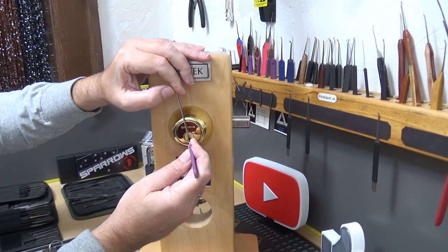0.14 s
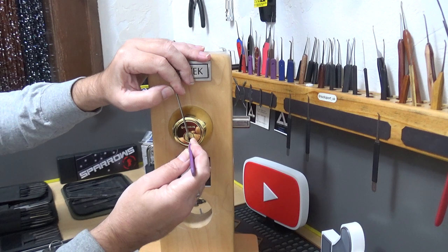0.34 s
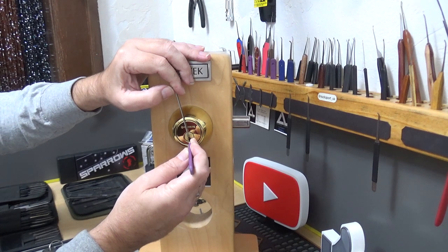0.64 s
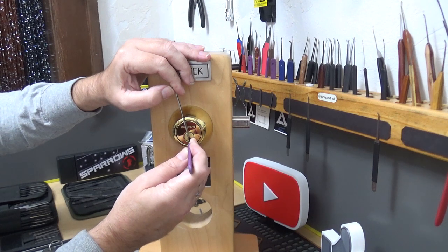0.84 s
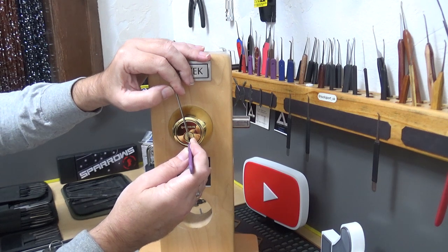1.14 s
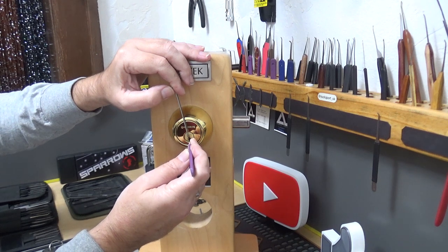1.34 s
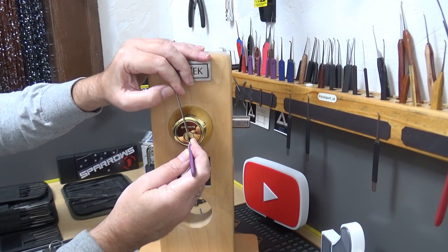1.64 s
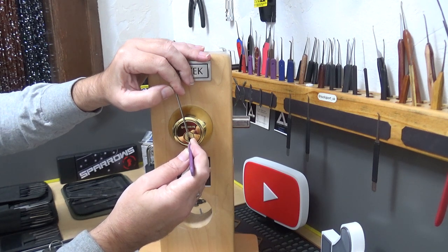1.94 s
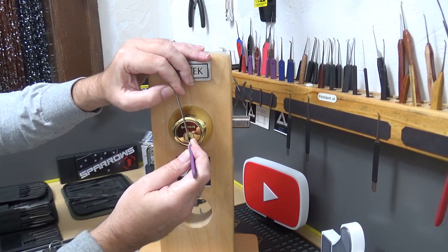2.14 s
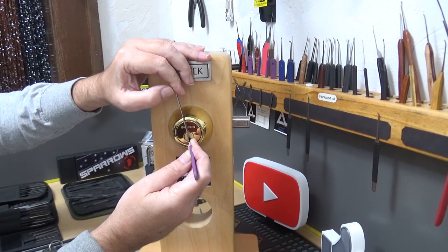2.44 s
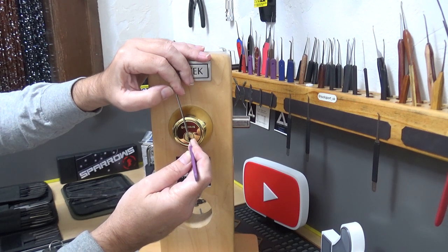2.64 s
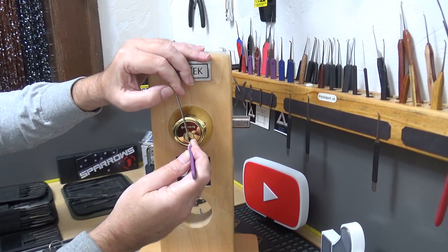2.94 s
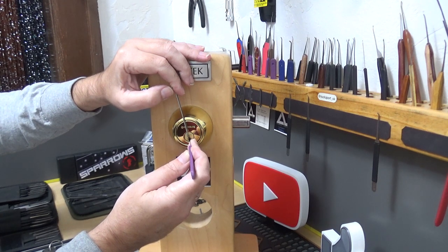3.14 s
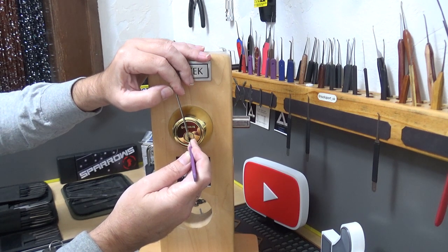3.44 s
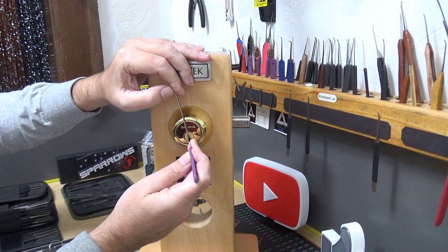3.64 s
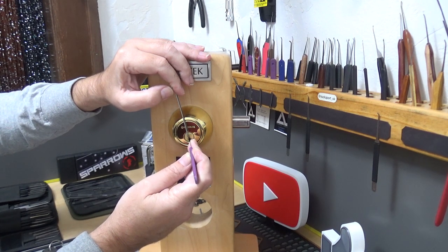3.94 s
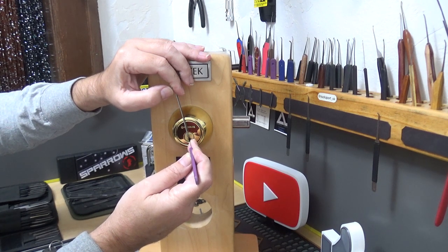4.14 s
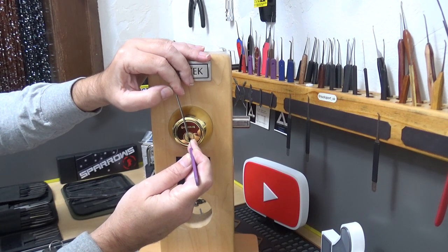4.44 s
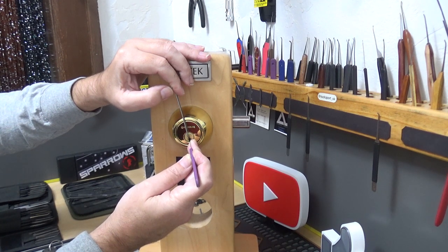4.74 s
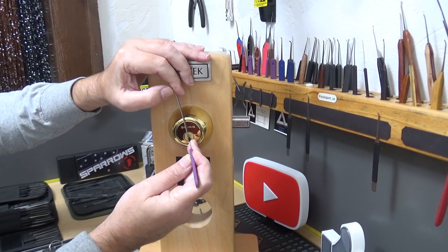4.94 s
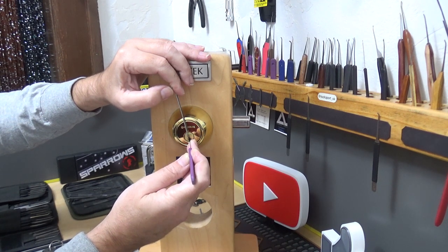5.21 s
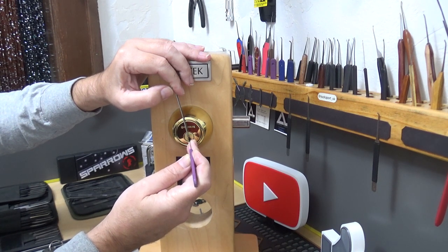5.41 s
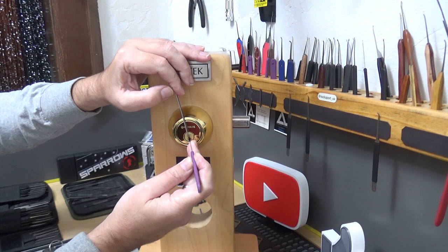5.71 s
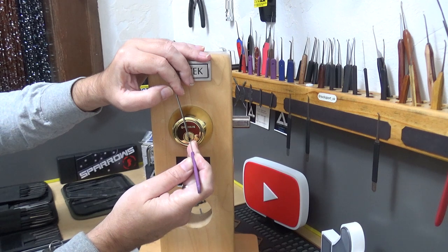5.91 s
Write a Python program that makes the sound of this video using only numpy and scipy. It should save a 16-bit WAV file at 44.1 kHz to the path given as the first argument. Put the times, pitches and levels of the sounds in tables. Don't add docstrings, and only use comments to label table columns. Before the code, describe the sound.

A small quiet room with steady soft hiss and a low murmur, heard close to a brass lock in a wooden stand on a bench. Around 0.55-0.65 s a faint tap and a clear click break the quiet. At 1.3 s a quick double knock lands, with another pair near 1.5 s, woody and metallic, with slight bench thumps. Faint ticks follow; a knock at 2.4 and a bright, ringing snap at 2.6, then a smaller pin click at 3.0. Near 3.46 s the pick scrapes grainily, straight into a hard snap at 3.54 with a dull thump. Only faint creaks and taps remain until the loudest crack at 4.85, with a heavier low thump. The hiss then drops; light clicks and short drags cluster around 5.1, tiny ticks at 5.8, and a last small click at 6.03. Every sound is short, with a brief room tail.

```python
import sys
import numpy as np
from scipy import signal
from scipy.fft import rfft, irfft, next_fast_len
from scipy.io import wavfile
from scipy.ndimage import uniform_filter1d, minimum_filter1d, map_coordinates

SR = 44100
rng = np.random.default_rng(int(sys.argv[2]) if len(sys.argv) > 2 else 0)


def ratio(d):
    e = np.asarray(d, float) / 20
    return 10 ** e


def wav_record(signal):
    frames = np.transpose(np.atleast_2d(signal))
    bounded = np.clip(frames, -1, 1)
    quanta = np.round(bounded * 32767).astype(np.int16)
    wavfile.write(sys.argv[1], SR, quanta)


N = 267819
LENGTH = SR // 3
t = np.arange(LENGTH) / SR
hz = np.fft.rfftfreq(2 * LENGTH, 1 / SR)


def along(points, x):
    f, v = np.transpose(points)
    return np.interp(np.log(x + 1), np.log(f + 1), v)


def peak(x):
    return x / np.max(np.abs(x))


def coloured(x, response):
    return irfft(rfft(x, 2 * LENGTH) * response)[:LENGTH]


def ring(f_hz, t60, rise):
    swell = (1 - np.exp(-t / rise)) ** 2
    return peak(np.sin(2 * np.pi * f_hz * t) * swell * ratio(-60 * t / t60))


def flutter(depth_db, rate):
    return ratio(depth_db * map_coordinates(rng.standard_normal(LENGTH // 40), [t * rate]))


# delay t/s, level/dB
BENCH_ECHO = (.00383, 1.5)
# delay t/s, level/dB
WALL_ECHOES = [(.008, -16), (0.01, -20), (0.0171, -13), (.021, -11)]


def echoed(x):
    dull = 0.25 + 0.9 / (1 + 1j * hz / 2800)
    echoes = sum(ratio(db) * np.exp(-2j * np.pi * hz * s) for s, db in [BENCH_ECHO, *WALL_ECHOES])
    return coloured(x, 1 + dull * echoes)


# f/Hz, t60 t/s
ROOM = [(700, 0.12), (1500, 0.18), (5000, 0.16), (10000, 0.15), (15000, 0.11)]


def add(track, s, x, room_db, blur_hz=0):
    f, when, z = signal.stft(rng.standard_normal(LENGTH), SR, nperseg=256)
    decay = ratio(-60 * when / along(ROOM, f)[:, None])
    tail = signal.istft(z * decay, SR, nperseg=256)[1][:LENGTH]
    tail *= 1 - np.exp(-t / 0.0081)
    feed = rfft(x, 2 * LENGTH)
    if blur_hz:
        power = uniform_filter1d(np.abs(feed) ** 2, size=round(blur_hz / hz[1]))
        feed = np.sqrt(np.abs(power))
    reverb = coloured(tail / np.linalg.norm(tail), feed)
    track[round(s * SR):][:LENGTH] += x + ratio(room_db) * reverb


# f/Hz, level/dB per Hz
AIR = [(12, -31), (20, -6), (103, -2), (246, -4.5), (899, -12), (1010, -14.5), (14200, -26.5),
       (15500, -27.5), (16900, -51)]
# t/s, level/dB
GAIN = [(0, 1), (4.85, 0.5), (4.898, -4.5), (5.5, -4.5), (6.08, -3)]


def air():
    m = next_fast_len(N)
    colour = ratio(along(AIR, np.fft.rfftfreq(m, 1 / SR)))
    hiss = irfft(rfft(rng.standard_normal(m)) * colour, m)[:N]
    gain_db = np.interp(np.arange(N) / SR, *np.transpose(GAIN))
    return ratio(-68 + gain_db) * hiss / np.std(hiss)


# t/s, peak level/dB, pitch f/Hz, low modes level/dB, upper modes level/dB
KNOCKS = [(0.6223, -27.5, 1229, -31, 1), (1.283, -18, 1292, -0.7, -0.5), (1.3211, -12.5, 1340, -11, -5),
          (1.4705, -13.5, 1290, -16.5, -5.5), (1.528, -26, 1318, -4.5, -11.5),
          (2.4212, -22.5, 1275, -37, -42), (2.6162, -18, 1203, -9, -8.5), (2.973, -54, 1310, -20, -5),
          (3.0181, -26.5, 1452, -16, -21), (3.5409, -6, 1290, -4, -9), (4.8506, -2.5, 1328, -9, -9),
          (5.1123, -35, 1274, -35, -6.5), (5.1217, -35, 1320, -33, 1), (5.1363, -46, 1360, -15, -13),
          (5.809, -49, 1248, -8, -6.5), (6.0273, -50, 1170, -20, -2)]
# t/s, peak level/dB, pitch f/Hz
TAPS = [(0.5521, -43.5, 1231), (0.7433, -62.5, 1237), (1.7695, -57.5, 1294), (2.192, -47.5, 1300),
        (2.8943, -57, 1237), (2.9317, -63, 1276), (2.953, -61.5, 1246), (4.0822, -55, 1316),
        (5.101, -50.5, 1360), (5.1536, -34, 1246), (5.1643, -51, 1188), (5.758, -49, 1304),
        (5.781, -40, 1430), (5.7951, -47, 1290)]
TAP_LOW_DB, TAP_UPPER_DB = -30, -21
# f/Hz, t60 t/s, level/dB
STAND_MODES = [
    [(849.8, 0.055, 0.5), (1079, 0.082, 2)],
    [(1572, 0.028, 5), (1780, 0.015, -1.5), (2167, 0.11, -8)],
]
RING_S, REST_HZ, HALVE_PER_HZ, HALVE_PER_DB = 0.016, 1290, 137, 22
SHORTEST_S, LONGEST_S, KNOCK_RISE_S = 0.0065, 0.075, 0.0008


def stand():
    track = np.zeros(N + SR)
    groups = []
    for modes in STAND_MODES:
        rings = [ratio(db) * ring(f, min(t60, LONGEST_S), KNOCK_RISE_S) for f, t60, db in modes]
        groups.append(peak(sum(rings)))
    low, upper = groups
    taps = [(*tap, TAP_LOW_DB, TAP_UPPER_DB) for tap in TAPS]
    for s, db, pitch_hz, low_db, upper_db in [*KNOCKS, *taps]:
        halvings = (pitch_hz - REST_HZ) / HALVE_PER_HZ + db / HALVE_PER_DB
        wood = ring(pitch_hz, max(RING_S * 0.5 ** halvings, SHORTEST_S), KNOCK_RISE_S)
        wood = wood + ratio(low_db + 0.5) * low + ratio(upper_db) * upper
        knock = peak(echoed(wood * flutter(1.6, 260)))
        add(track, s - 0.0008, ratio(db) * knock, room_db=-12, blur_hz=230)
    edge = signal.butter(10, 785, "high", fs=SR, output="sos")
    return signal.sosfilt(edge, track[:N])


# t/s, peak level/dB, f/Hz
STRUCK = [(.554, -62, 10800), (.624, -33, 14100), (0.623, -39.5, 2570), (1.284, -33.5, 3760),
          (1.471, -37.5, 3980), (1.472, -42, 3010), (1.529, -37.5, 3700), (2.422, -71, 2530),
          (2.618, -34, 7920), (2.617, -26, 5740), (3.019, -40, 8250), (3.019, -51, 14100),
          (4.851, -30, 7200), (5.116, -40.5, 8200), (5.122, -61, 2160), (5.138, -58, 8060),
          (5.779, -59, 8240), (5.888, -57, 3950), (5.892, -54, 4380)]
# t/s, peak level/dB, f/Hz
FLEXED = [(2.325, -84, 5010), (2.345, -67.5, 4620), (2.378, -70, 4600), (3.365, -65, 1800),
          (3.462, -52, 627), (3.465, -48.5, 1675), (3.461, -59, 3166), (3.49, -70, 3200),
          (3.459, -58, 5486), (3.461, -60, 4960), (3.91, -59.5, 676), (3.94, -61, 658), (3.97, -62.5, 639),
          (4.745, -68, 880), (4.77, -69.5, 821.4), (5.91, -69, 1573)]
STRUCK_CYCLES, STRUCK_T60 = 110, 0.06
WANDERINGS = 0.11


def tools():
    track = np.zeros(N + SR)
    for s, db, note_hz in STRUCK:
        t60 = np.clip(STRUCK_CYCLES / note_hz, 0.018, STRUCK_T60)
        note = flutter(4, 210) * ring(note_hz, t60, rise=0.0012)
        add(track, s, ratio(db) * note, room_db=-9, blur_hz=220)
    for s, db, note_hz in FLEXED:
        note = flutter(5.5, WANDERINGS * note_hz) * ring(note_hz, t60=0.09, rise=0.012)
        add(track, s, ratio(db - 2) * note, room_db=-5)
    return track[:N]


# f/Hz, width f/Hz, level/dB
BRASS = [(3080, 19, -11), (3830, 17, -1), (4576, 43, -5.5), (4855, 21, -1.5), (5100, 39, -4.5),
         (5070, 30, 1.5), (5380, 8.9, -4), (5910, 33, -2), (6830, 41, -8), (7100, 51, -8.5),
         (7600, 68, 9.5), (9240, 120, -3), (8660, 30, -14), (11300, 24, -2.5), (13000, 39, -9.5),
         (14400, 330, -6.5)]
BANDS_HZ = [5500, 3000, 8200, 11000, 14000]
LIFT_DB = [0.5, -4, 4, 3, 13]
LEAD = 128


def brass(table, top_db, rise, t60, crack_db, grain_db, edge_hz, blur_hz, room_db):
    track = np.zeros(N + SR)
    modes = 1
    for k, (c, width, db) in enumerate(BRASS):
        w = max(width, 130)
        modes = modes + (-1) ** k * ratio(db / 2 + 5) * 1j * hz * w / (c * c - hz * hz + 1j * hz * w)
    steep = (hz / edge_hz) ** 6
    body = modes * steep / (1 + steep) / (1 + (hz / 15300) ** 16)
    order = np.argsort(BANDS_HZ)
    shares = []
    for k in range(len(order)):
        nearness = along(np.transpose([np.sort(BANDS_HZ), order == k]), hz)
        shares.append(np.sin(np.pi / 2 * np.clip(2 * nearness - 0.5, 0, 1)) ** 2)
    for s, db, *beside_db in table:
        burst = rng.standard_normal(LENGTH) * (1 - np.exp(-t / rise)) * ratio(-60 * t / t60)
        burst = burst * flutter(grain_db, 531) + ratio(crack_db) * (t == 0)
        metal = echoed(coloured(np.roll(burst, LEAD), body))
        levels_db = np.add([0, *beside_db, beside_db[-1] + top_db], LIFT_DB)
        mix = sum(ratio(d) * peak(coloured(metal, share)) for d, share in zip(levels_db, shares))
        add(track, s - LEAD / SR, ratio(db - 4.5) * mix, room_db, blur_hz)
    return track[:N]


# t/s, peak level/dB at 4-7 kHz, then level/dB beside it at 2-4, 7-9.5, 9.5-12.5 kHz
SNAPS = [
    (0.5551, -59.5, -7, -16, -1),
    (0.6242, -24.5, 1, -2, -3.5),
    (1.3224, -39, 10.5, -5.5, -9),
    (2.4227, -59, 0, -12, -16),
    (2.6179, -19, 4, -2.5, -4.5),
    (3.5414, -15, -0.5, -8.5, -5),
    (4.8514, -7, 0, -12, -5.5),
    (1.285, -27, -7.5, -7, 3),
    (5.5544, -67, -7, -3, -11),
    (5.7964, -58, -15, -4.5, -7),
]
CLICKS = [
    (1.4697, -31.5, 3.5, -5, -3.5),
    (1.5284, -29, -7, -6, 3.5),
    (3.0193, -26, -27, -35, -3),
    (5.1123, -29.5, -16.5, -25, -19),
    (5.1214, -52, -9, -2.5, -19.5),
    (5.1434, -46, -11, -13, -12),
    (5.7808, -55, 1, -.6, -8),
    (5.89, -63, 12, -43, -33),
    (6.0305, -32.5, 5, -25, -10),
]
DRAGS = [
    (3.4594, -50.5, 19.5, -14, -17),
    (3.4844, -50.5, 11, -14, -22),
    (5.1008, -44, -2, -21, -33),
    (5.1297, -50, -7, -10, -15.5),
]


def lock():
    pins = dict(rise=0.00026, t60=0.023, crack_db=17.5, grain_db=-3, edge_hz=1600, blur_hz=280, room_db=-6)
    rub = dict(rise=0.0072, t60=0.07, crack_db=-19, grain_db=9, edge_hz=480, blur_hz=0, room_db=-11.5)
    struck = brass(SNAPS, top_db=-10.5, **pins) + brass(CLICKS, top_db=-19, **pins)
    return struck + brass(DRAGS, top_db=-8, **rub)


# t/s, peak level/dB, rocking level/dB
THUMPS = [
    (1.289, -56, -12),
    (1.325, -50.5, -11.5),
    (1.474, -62.5, -11.5),
    (2.425, -58.5, -9),
    (3.544, -44.5, -17),
    (4.854, -37.5, -21.5),
]
# f/Hz, t60 t/s
BENCH = [(103, 0.18), (129, 0.17), (48, 0.48)]
THUD_DB, THUD_HZ, THUD_T60 = -13, 420, 0.085


def bench():
    track = np.zeros(N + SR)
    first, second, rocking = [ring(*mode, rise=0.0055) for mode in BENCH]
    foot = 1j * hz * THUD_HZ / (THUD_HZ ** 2 - hz * hz + 1j * hz * THUD_HZ)
    for s, db, rocking_db in THUMPS:
        thud = peak(coloured(rng.standard_normal(LENGTH) * ratio(-60 * t / THUD_T60), foot))
        blow = ratio(db - 4.5) * flutter(3.5, 45) * (first + second)
        blow = blow + ratio(db + rocking_db) * rocking + ratio(db + THUD_DB) * thud
        track[round(s * SR):][:LENGTH] += blow
    return track[:N]


def scene():
    return (air() + stand() + tools() + lock() + bench())[None]


def top_cut(x):
    return signal.sosfilt(signal.butter(12, 17010, fs=SR, output="sos"), x)


def record(dry):
    size = round(0.038 * SR)
    before = np.arange(size)[::-1] / SR
    smear = rng.standard_normal(size) * np.cos(np.pi / 2 * before * SR / size)
    smear = signal.lfilter([1, -0.65], 1, smear)
    held_peak = -minimum_filter1d(-np.abs(dry[0]), size=4000)
    loudness = uniform_filter1d(held_peak, size=1000)
    spread = dry[0] / (1 + (loudness / 0.27) ** 1.8)
    spread = spread * map_coordinates(rng.standard_normal(N // 40), [np.arange(N) * 650 / SR])
    ahead = signal.fftconvolve(spread, smear / np.linalg.norm(smear))[size:][:N]
    heard = dry + ratio(-10) * np.pad(ahead, (0, N - len(ahead)))
    limit = signal.butter(18, 16150, fs=SR, output="sos")
    return top_cut(signal.sosfilt(limit, heard))


dry = scene()
out = record(dry)
wav_record(out)
```